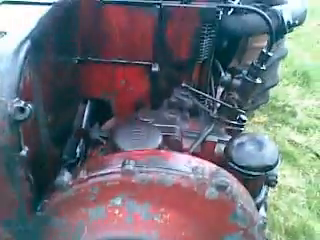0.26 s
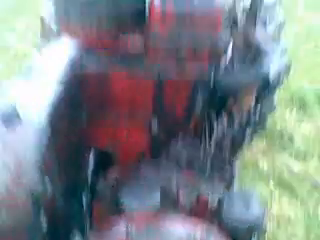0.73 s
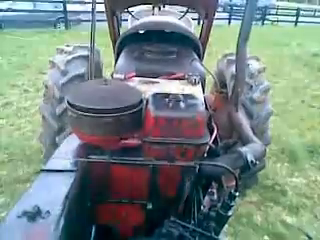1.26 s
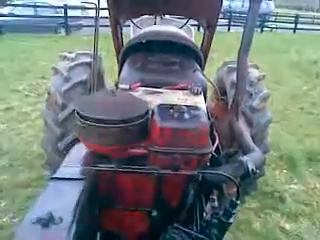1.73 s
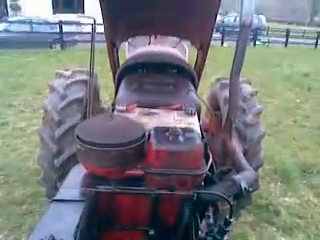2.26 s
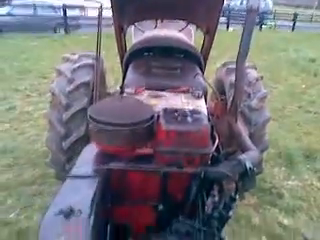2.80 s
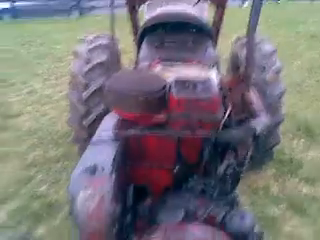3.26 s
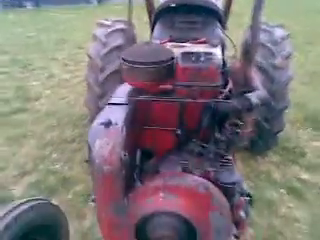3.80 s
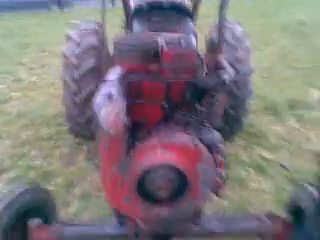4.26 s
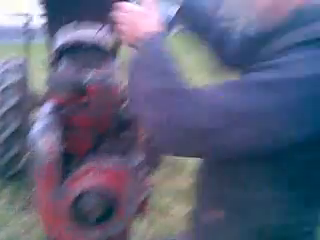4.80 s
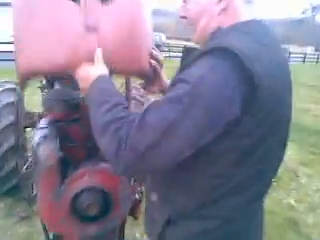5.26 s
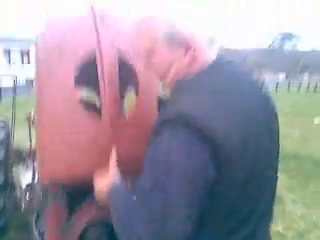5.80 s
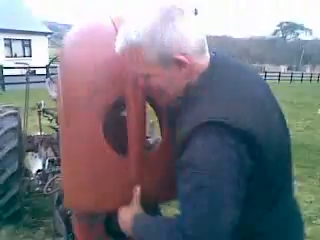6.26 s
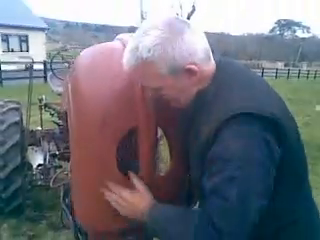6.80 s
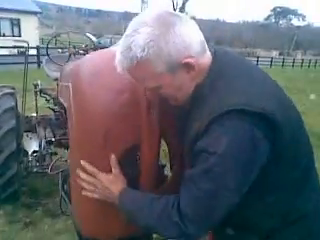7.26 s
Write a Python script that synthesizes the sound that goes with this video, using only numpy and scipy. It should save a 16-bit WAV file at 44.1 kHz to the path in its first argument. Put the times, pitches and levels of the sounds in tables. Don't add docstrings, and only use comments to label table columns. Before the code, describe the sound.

Close in an open field, an old four-cylinder tractor engine idles steadily, a hard iron knock ringing about seven times a second with low exhaust thumps between. Rumble, clatter and valve hiss pulse along. The microphone drifts back and the engine softens slightly; a metal bonnet buzzes, gives a heavy dull bump, then seats with a knock, tick and short scrape. Idling continues, duller and a little more resonant. Small hand-held microphone, thin treble.

```python
import sys
import numpy as np
from scipy import signal
from scipy.fft import rfft, irfft
from scipy.io import wavfile
from scipy.ndimage import uniform_filter1d

SR = 44100
rng = np.random.default_rng(int(sys.argv[2]) if len(sys.argv) > 2 else 0)


def log_audio(samples):
    frames = np.atleast_2d(samples).T
    limited = np.clip(frames, -1, 1)
    pcm = np.round(limited * 32767).astype(np.int16)
    wavfile.write(sys.argv[1], SR, pcm)


def level_to_linear(level):
    exponent = np.asarray(level, float) / 20
    return 10 ** exponent


N = 332514

CARRIED_S, HUNG_S, LOWERED_S, SEATED_S = 4.35, 5.5, 5.9, 6.5


def in_time(rows, at):
    s, *columns = np.transpose(rows)
    return [np.interp(at, s, column) for column in columns]


def ramp(t, start_s, end_s):
    return np.clip((t - start_s) / (end_s - start_s), 0, 1)


def heard(level_db, share, t):
    # (time [s], level [dB])
    nearness = [(0, 2.5), (.4, 2.5), (.8, 1.5), (1.2, -0.5), (2, 0.5), (3, -0.5), (4, -1.5), (4.5, -2.5),
                (5, -3), (5.5, -3), (6.3, -5), (6.9, -4.5), (7.54, -5)]
    return level_db + share * in_time(nearness, t)[0]


def bonnet(t):
    seated = ramp(t, LOWERED_S, SEATED_S)
    return ramp(t, CARRIED_S, HUNG_S) - seated, seated


def coloured(x, spectrum):
    hz, db = np.transpose(spectrum)
    axis = np.fft.rfftfreq(N, 1 / SR) + 1
    gain = level_to_linear(np.interp(np.log(axis), np.log(hz), db))
    y = irfft(rfft(x) * gain, N)
    return y / np.std(y)


def looped_noise(since, repeat, life_s):
    age = np.arange(N) / SR / life_s
    patterns = rng.standard_normal((40, 6200))
    k = np.minimum(age.astype(int), 38)
    turn = age % 1 * np.pi / 2
    loop = patterns[k, since] * np.cos(turn) + patterns[k + 1, since] * np.sin(turn)
    share = np.clip(repeat, 0, 1)
    return np.sqrt(share) * loop + np.sqrt(1 - share) * rng.standard_normal(N)


def beat(swells, since):
    cycle_ms = 135.2
    ms = since * 1000 / SR
    levels = []
    for peak_ms, db, rise, fall in swells:
        for turn_ms in (-cycle_ms, 0, cycle_ms):
            gap = ms + turn_ms - peak_ms
            levels.append(db - np.maximum(fall * gap, -rise * gap))
    return uniform_filter1d(np.max(levels, axis=0), size=40)


def add(out, s, wave):
    i = round(s * SR)
    part = wave[max(-i, 0):max(N - i, 0)]
    out[max(i, 0):max(i, 0) + len(part)] += part


def ring(hz, t60, rise_ms=0.81):
    t = np.arange(5000) / SR
    return np.sin(2 * np.pi * hz * t) * level_to_linear(-60 * t / t60) * (1 - np.exp(-1000 * t / rise_ms))


def rumble(since, turns):
    # (frequency [Hz], level per Hz [dB])
    rumble_colour = [(13, -51.5), (22, -10), (59, -13), (145, -2.5), (200, 0.5), (221, 2.5), (258, -15),
                     (361, -12), (480, -12.5), (620, -39.5), (1060, -120)]
    # (multiple of the cycle rate, level over the rumble [dB])
    crank_tones = [(7, -37.5), (15, -14), (29, -11)]
    t = np.arange(N) / SR
    noise = coloured(looped_noise(since, repeat=.85, life_s=2.5), rumble_colour)
    deep = signal.sosfiltfilt(signal.butter(2, 140, fs=SR, output="sos"), noise)
    depth = level_to_linear(heard(2.4, 0.67, t)) - 1
    tones = sum(level_to_linear(db) * np.sqrt(2) * np.sin(2 * np.pi * round(k) * turns) for k, db in crank_tones)
    return level_to_linear(heard(-35.5, .6, t)) * (noise + depth * deep + tones)


def valve_hiss(since, cycle):
    # (frequency [Hz], level per Hz [dB])
    hiss_colour = [(1500, -41), (2100, -6), (2760, -6.5), (4200, -10), (5500, -9.5), (6100, -14),
                   (7000, -13.5), (8000, -18.5), (9300, -12), (11000, -67)]
    # (peak time [ms], peak level [dB], rise [dB/ms], fall [dB/ms])
    hiss_swells = [(4, 7.5, 1.8, .7), (14, 1, .9, .19), (58, 4.5, .25, .18)]
    noise = coloured(looped_noise(since, repeat=0.022, life_s=1.0), hiss_colour)
    level_db = heard(-50.0, 1.04, np.arange(N) / SR) + beat(hiss_swells, since)
    cycle_db = 1.5 * rng.standard_normal(cycle.max() + 1)
    return level_to_linear(level_db + cycle_db[cycle]) * noise


def clatter(since):
    # (frequency [Hz], level per Hz [dB])
    clatter_colour = [(210, -37.5), (350, -16), (503, -7), (794, -2), (922, -6.5), (1180, -9), (1380, -10),
                      (1550, -20), (1830, -16), (2090, -30), (2300, -27), (2990, -49), (5060, -120)]
    # (peak time [ms], peak level [dB], rise [dB/ms], fall [dB/ms])
    clatter_swells = [(9, 5, 1.5, .1)]
    noise = coloured(looped_noise(since, repeat=0.39, life_s=0.835), clatter_colour)
    return level_to_linear(heard(-33.5, 0.96, np.arange(N) / SR) + beat(clatter_swells, since)) * noise


def sheet_buzz(since):
    # (peak time [ms], peak level [dB], rise [dB/ms], fall [dB/ms])
    buzz_swells = [(2.5, 4.9, 2.5, 0.14), (31.4, 2, 0.22, 0.17)]
    t = np.arange(N) / SR
    happens = rng.random(N) < 400 / SR
    force = level_to_linear(4.0 * np.minimum(rng.exponential(1, N), 4))
    taps = happens * force * rng.choice([-1, 1], N)
    buzz = coloured(taps, [(1800, -52.5), (2200, -9.0), (2380, -4.0), (2600, -7.5), (3100, -23.0), (3600, -43.0)])
    loose = ramp(t, CARRIED_S - .3, CARRIED_S) - ramp(t, SEATED_S - .2, SEATED_S + .3)
    return level_to_linear(heard(-54, 0.43, t) + 6.5 * loose + beat(buzz_swells, since)) * buzz


def bonnet_bumps():
    # (time [s], peak level [dB], frequency [Hz], time to fall 60 dB [s])
    bumps = [
        (5.643, -7.5, 237, 0.038),
        (5.669, -18, 180, 0.11),
        (5.689, -28.5, 214.6, 0.38),
        (5.72, -32, 170, 0.11),
        (6.269, -19.5, 547, 0.096),
        (4.4, -23, 720, 0.07),
        (6.275, -26, 2850, 0.049),
        (6.29, -33, 2790, 0.068),
        (6.268, -40, 5900, .05),
    ]
    scrape_s, scrape_db, fade_s = 6.262, -33.5, .028
    out, t = np.zeros(N), np.arange(N) / SR - scrape_s
    for s, db, hz, t60 in bumps:
        add(out, s, level_to_linear(db) * ring(hz, t60, rise_ms=5.3))
    scrape = coloured(rng.standard_normal(N), [(400, -33), (700, 5.5), (2800, -11.0), (3700, -8.5),
                                               (4000, -19.5), (6500, -19.5), (8000, -69)])
    fade = np.exp(-(np.maximum(t - .02, 0) / fade_s) ** 2)
    return out + level_to_linear(scrape_db) * scrape * (t > 0) * fade


def exhaust(starts):
    # (time in cycle [ms], level under their common level [dB], frequency [Hz])
    weak_puffs = [(2.6, -7, 225), (16.45, -12, 170), (26.28, -9.5, 289), (35.3, -13.5, 86),
                  (45.03, -18, 340), (53.97, -14, 277), (82.05, -7, 287), (100, -22, 260),
                  (120.1, -15.5, 230)]
    main_ms, second_ms, screened_db = 72.0, 108.3, 5.5
    out, t = np.zeros(N), np.arange(-900, 900) / SR
    chance = rng.standard_normal((len(starts), len(weak_puffs) + 2))
    hung, seated = bonnet(starts)
    main_db = -23.5 - screened_db * hung + 2.5 * seated + .9 * chance[:, -1]
    second_db = -31 + 4 * seated + 1.6 * chance[:, -2]
    lengths_ms = 2.6 + .7 * hung + 2.0 * seated
    for k, (s, length_ms) in enumerate(zip(starts, lengths_ms)):
        hz = 199 + 1.1 * s
        centre = (length_ms - 2.6) * 1.1 / 1000
        spread = np.exp(-.5 * ((t - centre) * 1000 / length_ms) ** 2)
        even_db = 7.0 - 10 * np.log10(length_ms / 1.64)
        puffs = [(main_ms, main_db[k], hz), (second_ms, second_db[k], hz * 0.98)]
        for (ms, db, weak_hz), c in zip(weak_puffs, chance[k]):
            puffs.append((ms, -26 - screened_db * hung[k] + db + 2.2 * c, weak_hz))
        for ms, db, puff_hz in puffs:
            add(out, s + ms / 1000 + t[0], -level_to_linear(db + even_db) * np.cos(2 * np.pi * puff_hz * t) * spread)
    return out


def knocks(starts):
    # (time [s], middle ring [Hz], upper
    # ring [Hz], upper ring level [dB], top ring level [dB])
    block_tones = [(0, 1153, 1630, -20.5, -24), (.5, 1157, 1712, -22, -19.5), (1, 1025, 1620, -20.5, -13),
                   (1.35, 1055, 1730, -29.5, -22), (1.6, 1047, 1810, -19, -14.5),
                   (2.2, 1178, 1580, -54.5, 24.5), (2.8, 1050, 1610, -24.5, -5.5),
                   (3.4, 1047, 1640, -26.5, -16), (3.9, 1056, 1670, -20, -33), (4.6, 1050, 1670, -26, -28),
                   (5.3, 1030, 1700, -34.5, -14), (5.75, 958, 1690, -31.5, -16), (6.6, 958, 1685, -34, -6.5),
                   (7.1, 1037, 1695, -33.5, -22), (7.54, 1070, 1774, -33, -11)]
    # (time in cycle [ms], level into low rings [dB], middle rings [dB], upper rings [dB])
    contacts = [
        (0, 0, -5, -20),
        (3.2, -18, -11, 0),
        (7.9, -9, -4, -11),
        (10.6, -5, 0, -14),
        (21, -11, -11, -20),
    ]
    # (frequency [Hz], level [dB], time to fall 60 dB [s])
    block_rings = [
        (700, -3, .025),
        (890, -2, .02),
        (1430, -12, .03),
    ]
    # (time [s], level [dB])
    blow_force = [(0, -9.5), (.3, -5.5), (1, -10), (1.3, -12.5), (1.9, -8.5), (2.3, -11.5), (2.7, -7.5),
                  (3.5, -11.5), (4.1, -19), (4.5, -11.5), (5.2, -10.5), (5.6, -14), (6.1, -15.5),
                  (6.8, -7.5), (7.2, -11.5), (7.54, -18.5)]
    # (time [s], first blow level [dB], rebound level [dB])
    odd_strokes = [(.042, -0.5, -0.5), (.177, -1, -5), (.312, 0.5, -8), (.717, 1, -15), (.852, 0, 3.5),
                   (.987, 3, 4), (1.256, 0.5, 5), (1.661, 1.5, -1), (1.93, 2, -13), (2.605, 0, -18),
                   (2.739, 1, 2), (3.549, 2.5, 1.5), (3.82, -0.5, -9), (4.496, 0, -10), (4.767, -0.5, -10),
                   (5.445, -1, -7), (6.123, 6, -5), (6.258, -4, 3), (6.53, -2.5, -12), (6.801, -4.5, -11),
                   (6.937, -3.5, -22), (7.208, 3.5, -8), (7.344, 3, 8.5), (7.479, 7.5, -1), (1.526, 2.5, 3),
                   (2.335, 1.5, 1), (2.47, 1.5, -5), (5.851, 2, -6), (5.987, 2.5, -2), (6.665, -1, -5)]
    upper_t60, top_t60, top_lag_s = .03, .03, .005
    out, chance = np.zeros(N), rng.standard_normal((len(starts), len(contacts), 3))
    usual = in_time(blow_force, starts)[0]
    held = ramp(starts, CARRIED_S, CARRIED_S + 0.3)
    hung = ramp(starts, HUNG_S - .3, HUNG_S)
    seated = ramp(starts, SEATED_S - .1, SEATED_S + .1)
    first = usual + .7 * chance[:, 0, 0]
    rebound = heard(-20, 0.69, starts) - .6 * chance[:, 0, 0] + 1.2 * chance[:, 0, 1]
    for s, first_db, rebound_db in odd_strokes:
        k = np.argmin(np.abs(starts - s))
        first[k] += first_db
        rebound[k] += rebound_db
    long_db = -12.0 - 6 * (held - hung) + 0.6 * hung - 18 * seated - usual
    long_hz = 805.4 - 42.2 * (hung - seated)
    for k, (s, mid_hz, upper_hz, upper_db, top_db) in enumerate(zip(starts, *in_time(block_tones, starts))):
        slow = 1 + 5 * hung[k]
        short = sum(level_to_linear(db) * ring(hz, t60, rise_ms=.27 * slow) for hz, db, t60 in block_rings)
        low = short + level_to_linear(long_db[k]) * ring(long_hz[k], .055, rise_ms=.8 * slow)
        mid_rise_ms = 1.2 * np.sqrt(slow)
        middle = ring(mid_hz - 60, .032, mid_rise_ms) + ring(mid_hz + 95, .026, mid_rise_ms)
        middle = level_to_linear(5) * middle
        top = np.roll(ring(1880, top_t60, rise_ms=1.5), round(top_lag_s * SR))
        twin = ring(upper_hz + 105, upper_t60, rise_ms=0.86)
        bright = ring(upper_hz, upper_t60, rise_ms=1.5) + level_to_linear(top_db) * top + level_to_linear(-7) * twin
        for j, (ms, low_db, mid_db, high_db) in enumerate(contacts):
            at = s - .0006 + ms / 1000
            level_db = first[k] - 3.0
            if j > 0:
                at += chance[k, j, 0] / 30000
                level_db = rebound[k] - 1.5 + 2.6 * chance[k, j, 1]
            wave = level_to_linear(level_db) * (level_to_linear(low_db) * low + level_to_linear(mid_db) * middle)
            bright_db = upper_db + 9.0 + high_db + 2.2 * chance[k, j, 2]
            add(out, at, wave + level_to_linear(bright_db) * bright)
    out = signal.sosfilt(signal.butter(7, 650, "high", fs=SR, output="sos"), out)
    return signal.sosfilt(signal.butter(4, 2100, fs=SR, output="sos"), out)


def scene():
    # (cycle number, time [s])
    crank_times = [(-1, -.0930), (0, .0420), (4, .5821), (23, 3.1439), (30, 4.0900), (36, 4.9023),
                   (45, 6.1226), (49, 6.6652), (56, 7.6151)]
    number, s = np.transpose(crank_times)
    starts = np.interp(np.arange(-1, 57), number, s)
    n = np.arange(N)
    cycle = np.searchsorted(starts, n / SR, "right") - 1
    since = n - np.round(starts * SR).astype(int)[cycle]
    turns = np.interp(n / SR, s, number)
    noises = rumble(since, turns) + valve_hiss(since, cycle) + clatter(since)
    sheet = sheet_buzz(since) + bonnet_bumps()
    return (noises + sheet + exhaust(starts) + knocks(starts))[None]


def thinned(x, size, count, pick):
    # (frequency [Hz], level over its usual [dB])
    survival = [(2700, -30), (3300, -9), (3900, -4), (5800, -2.5), (6400, 3), (7200, 8), (8000, 13),
                (9400, 12)]
    window = np.sin(np.pi * (np.arange(size) + .5) / size)
    hz, _, z = signal.stft(x, SR, window, size)
    band = np.arange(len(hz)) // count
    power = np.add.reduceat(np.abs(z) ** 2, np.arange(0, len(hz), count)) / count + 1e-20
    need_db = np.interp(hz, *np.transpose(survival))[:, None] + 4.0 * rng.standard_normal(power.shape)[band]
    usual = uniform_filter1d(np.log(power), size=round(1.5 * SR / size), axis=1)
    alive = power[band] > np.exp(usual[band]) * level_to_linear(2 * need_db)
    strictness = pick * np.clip(hz[:, None] / 1200 - 2.2, 0, 1)
    strong = np.abs(z) ** 2 > power[band] * strictness
    return signal.istft(z * alive * strong, SR, window, size)[1][:N]


def top_cut(x):
    return signal.sosfilt(signal.butter(12, 9500, fs=SR, output="sos"), x)


def record(dry):
    dry = .55 * np.tanh(dry / .55)
    band = signal.butter(2, [600, 2000], "band", fs=SR, output="sos")
    level = uniform_filter1d(np.abs(signal.sosfilt(band, dry[0])), size=256)
    sudden = np.roll(level, -350) > 2.8 * np.roll(level, 50)
    sudden = sudden | np.roll(sudden, 200)
    blocks = np.arange(N) // 1024
    short = uniform_filter1d(np.bincount(blocks, sudden)[blocks].clip(0, 1), size=256)
    quick = thinned(dry[0], size=256, count=3, pick=.8)
    steady = thinned(dry[0], size=2048, count=16, pick=2.1)
    mix = short * quick + (1 - short) * steady
    cut = signal.sosfilt(signal.cheby2(12, 50, 9800, fs=SR, output="sos"), mix[None])
    return top_cut(cut)


dry = scene()
out = record(dry)
log_audio(out)
```